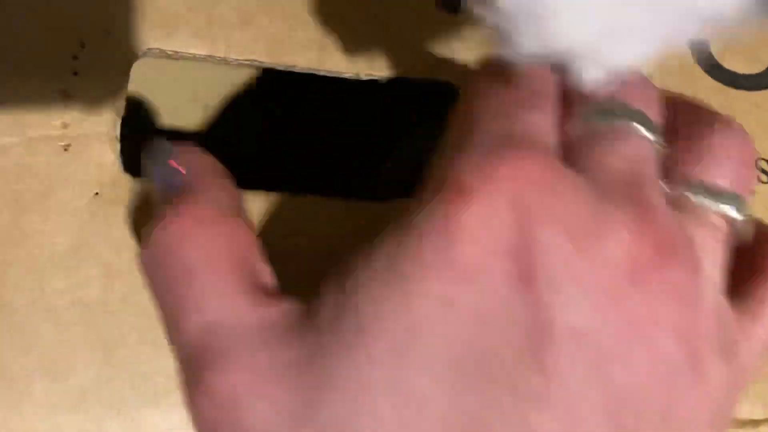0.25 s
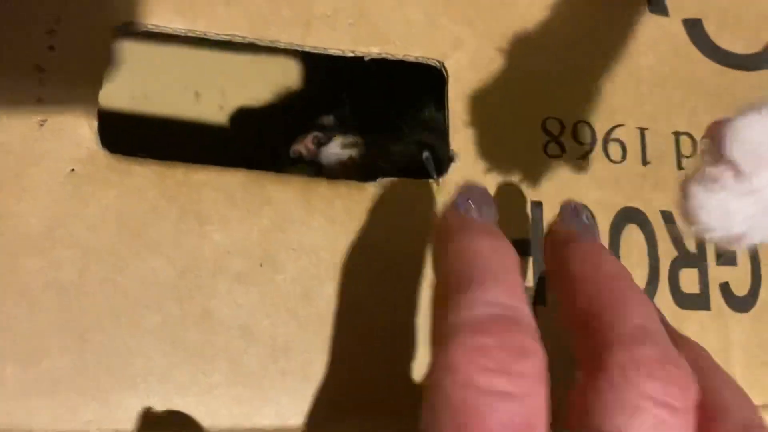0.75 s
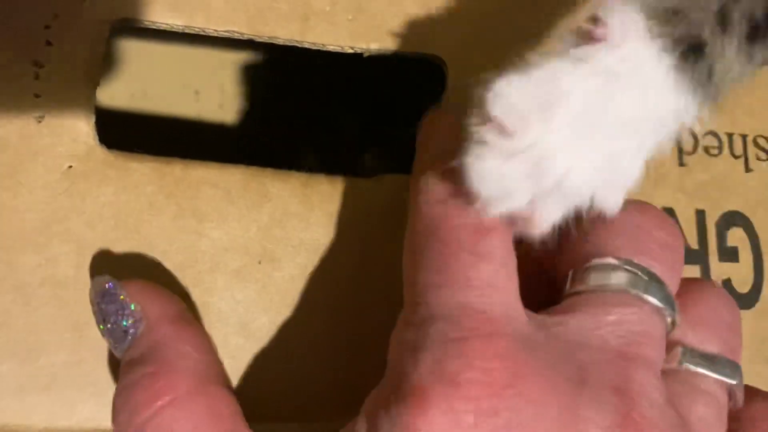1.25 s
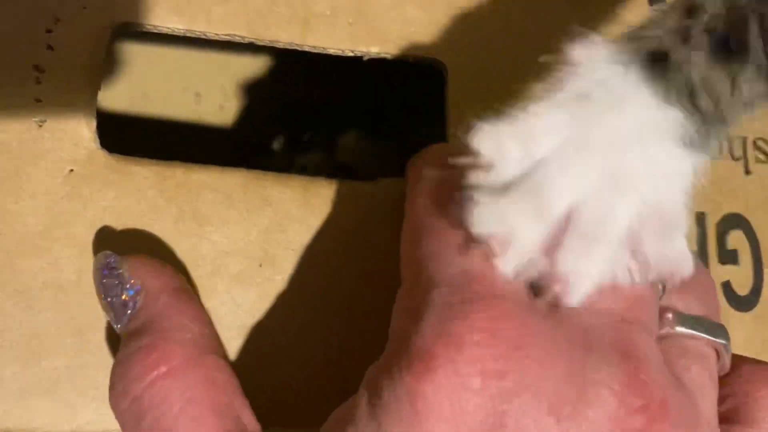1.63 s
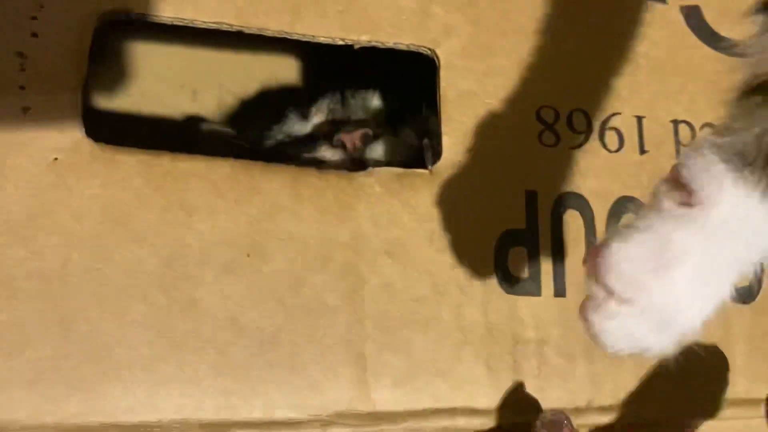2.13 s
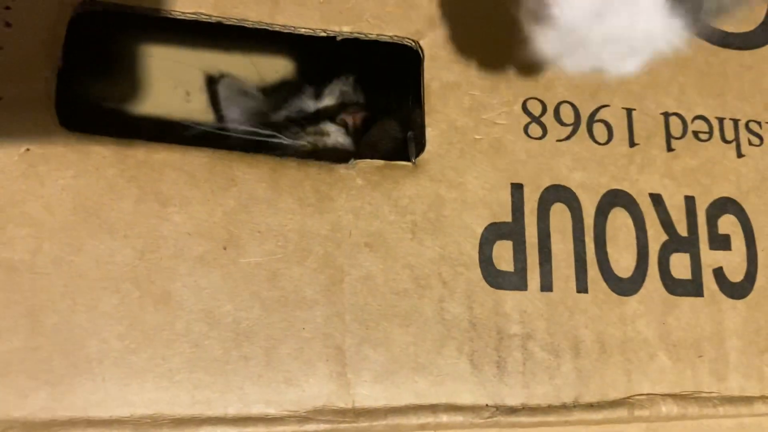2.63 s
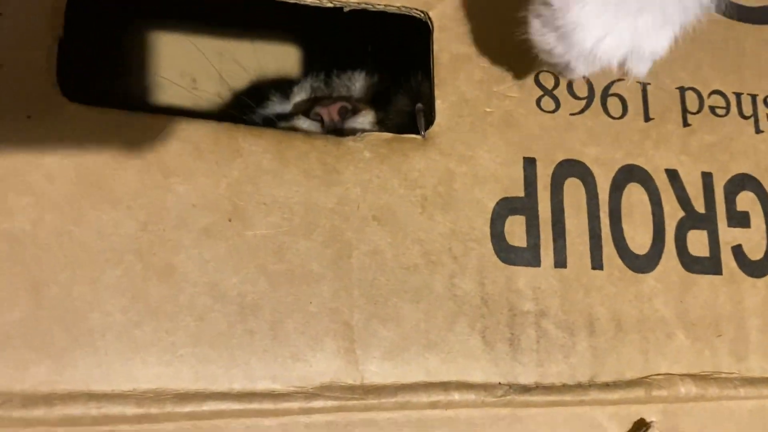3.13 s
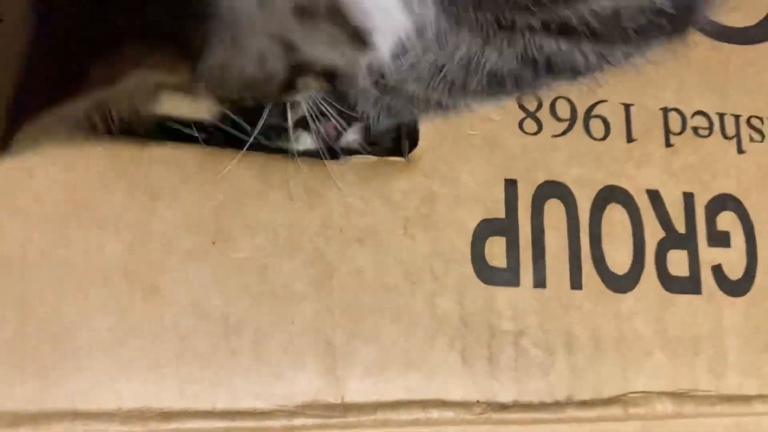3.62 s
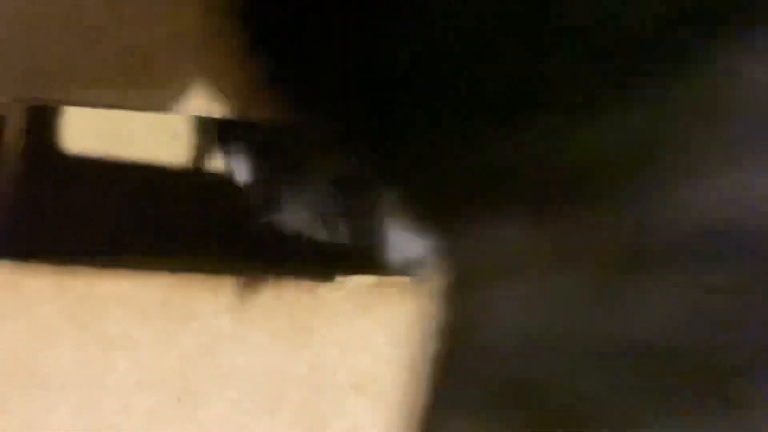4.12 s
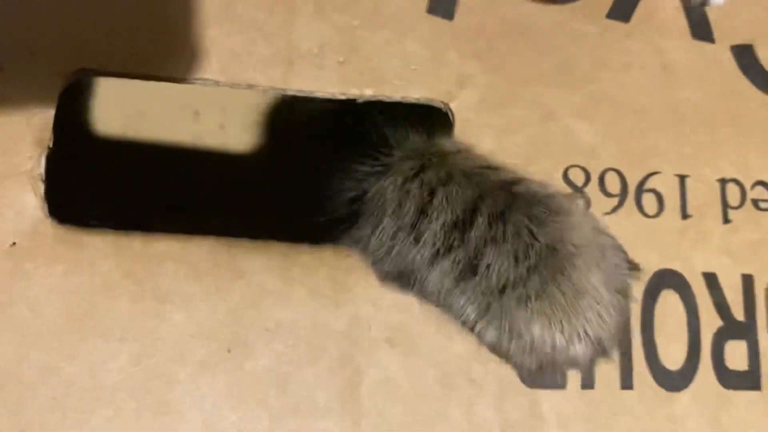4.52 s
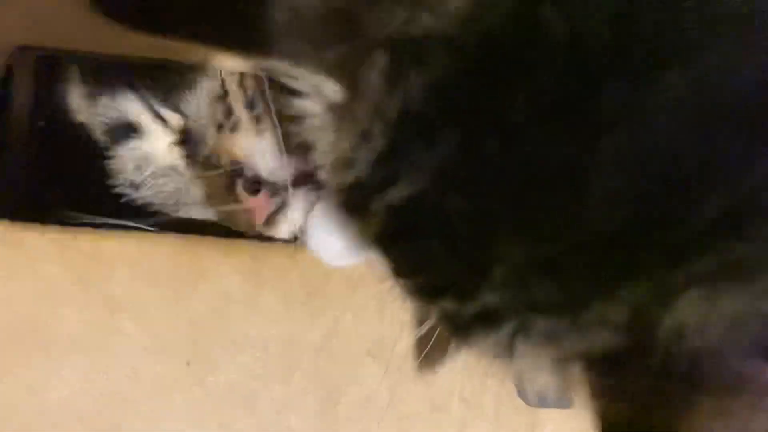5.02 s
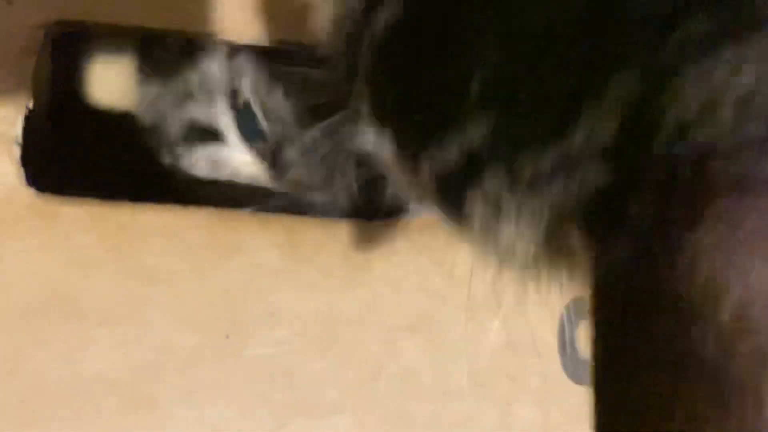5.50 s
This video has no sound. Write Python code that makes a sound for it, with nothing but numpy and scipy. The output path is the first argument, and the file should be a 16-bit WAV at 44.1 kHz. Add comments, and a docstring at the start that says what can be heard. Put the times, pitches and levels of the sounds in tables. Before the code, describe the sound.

Paws pat and bat a hollow cardboard box right beside the microphone. Early sounds are small: muffled bumps, faint ticks, brushing fur and pads. After three and a half seconds the blows grow heavier, with low, quickly damped booms, crisp claw clatter and short scrapes. A brief lull of toe pats precedes a last scuffle. Indoors, little echo, with faint room air and soft box rumble beneath.

```python
"""Small room, grip hole of a cardboard box, very near the microphone: two cats and a hand play.
Paws thump the panels: decaying sines swoop down in pitch over the ringing modes of the box.
Claws and nails tap and scratch: bursts of slips ring the card; toes pat it with dull knocks.
Pads slide on after each tap and longer strokes scuff: gritty noise shaped by stroke speed.
A low rumble of the swaying box and quiet air, both coloured noise, lie underneath."""
import sys
import numpy as np
from scipy import signal
from scipy.fft import rfft, irfft
from scipy.io import wavfile

SR = 44100
rng = np.random.default_rng(int(sys.argv[2]) if len(sys.argv) > 2 else 0)


def dump(signal):
    """Clip the signal to [-1, 1] and save it as 16-bit WAV at the path in sys.argv[1]."""
    limited = np.clip(np.atleast_2d(signal).T, -1, 1)
    pcm = np.round(limited * 32767).astype(np.int16)
    wavfile.write(sys.argv[1], SR, pcm)


N = 253997

# All event levels are relative: each source adds its own gain.
# Soft blows that flap a panel: t/s, level/dB, settled pitch f/Hz
THUMP_EVENTS = [(0.033, -33.5, 158), (0.096, -31.5, 93.6), (0.121, -37, 148), (0.254, -38, 160),
                (0.385, -39.5, 140), (0.608, -39.5, 70), (0.863, -26.5, 114.6), (0.893, -35.5, 53.6),
                (1.098, -26.5, 98.3), (1.105, -42.5, 347), (1.286, -30.5, 70), (1.29, -47.5, 204.5),
                (1.43, -43, 158), (1.843, -33, 56.9), (1.85, -51.5, 276), (2.191, -42.5, 233),
                (2.402, -43.5, 305), (2.473, -35.5, 173), (2.528, -40, 322), (2.583, -26, 55.3),
                (3.092, -36.5, 207.6), (3.115, -48.5, 263), (3.409, -38.5, 163.6), (3.486, -15.5, 137.7),
                (3.692, -39.5, 356.5), (3.85, -30.5, 200), (3.877, -22, 54.4), (4.124, -35, 550),
                (4.144, -22, 52.5), (4.264, -37.5, 225.3), (4.278, -23.5, 53), (4.403, -36, 129),
                (4.482, -25.5, 145.7), (4.669, -18, 174.2), (4.691, -18, 117.6), (4.742, -24.5, 63),
                (4.789, -25.5, 88), (4.856, -26, 111), (4.876, -35, 114), (5.309, -31, 122),
                (5.342, -40.5, 142), (5.492, -31.5, 101), (5.591, -23.5, 137), (5.749, -36.5, 168)]
# Claws and nails on the card: t/s, knock level/dB, tick level/dB, scratch length/s, knock corner f/Hz
TAP_EVENTS = [(0.031, -49, -47, 0.0072, 2450), (0.0411, -50, -40, 0.0015, 4130),
              (0.122, -47.5, -72, 0.003, 1540), (0.256, -40.5, -60.5, 0.0024, 1150),
              (0.3856, -70, -68, 0.0021, 1500), (0.613, -99, -56, 0.0024, 1950),
              (0.8211, -33, -55, 0.0029, 3730), (0.86, -49, -49, 0.0015, 1510),
              (1.0945, -68, -49.5, 0.001, 3020), (1.288, -63, -66, 0.0027, 1150),
              (1.3617, -46.5, -68, 0.00074, 2750), (1.432, -43.5, -61.5, 0.00061, 1380),
              (1.676, -58, -89, 0.00041, 3360), (2.748, -43.5, -60, 0.0081, 2550),
              (3.0307, -49.5, -64.5, 0.0019, 1750), (3.094, -57, -56.5, 0.0026, 1230),
              (3.562, -51, -65, 0.00085, 1490), (3.691, -37.5, -50, 0.015, 1540),
              (3.8433, -43, -48, 0.003, 2950), (3.914, -48, -44, 0.0031, 4250),
              (4.1246, -30, -41, 0.005, 1560), (4.137, -35.5, -48, 0.0089, 1550),
              (4.264, -49.5, -54, 0.0065, 1520), (4.539, -38.5, -59, 0.00051, 2340),
              (4.671, -41.5, -48.5, 0.016, 1390), (4.764, -37, -57, 0.0096, 2850),
              (4.791, -34, -38, 0.008, 4700), (4.804, -35, -63, 0.018, 3460),
              (4.856, -25, -35, 0.001, 3520), (4.874, -34, -38.5, 0.0047, 2330),
              (5.308, -40, -43, 0.0053, 3730), (5.338, -34, -45, 0.0023, 3600),
              (5.35, -30, -44, 0.0032, 3440), (5.391, -40, -77, 0.0027, 1710),
              (5.493, -56, -43.5, 0.0006, 1560), (5.5271, -44, -48.5, 0.011, 2000)]
# Long strokes of fur and pads: fastest moment t/s, half of full duration/s, rub level/dB,
# fur hiss level/dB, rub corner f/Hz
SCUFF_EVENTS = [(0.03, 0.29, -49, -60.5, 1800), (0.148, 0.08, -82, -67.5, 1500),
                (0.474, 0.5, -65.5, -61, 1790), (0.603, 0.13, -52.5, -82, 1850),
                (0.855, 0.13, -54, -66.5, 2390), (0.919, 0.14, -50.5, -66, 1720),
                (1.356, 0.037, -87, -70, 2000), (1.727, 0.19, -54.5, -71, 2100),
                (2.183, 0.13, -52.5, -98, 814), (2.414, 0.46, -49.5, -58.5, 1230),
                (2.456, 0.16, -49, -68.5, 1170), (2.551, 0.15, -45.5, -55, 834),
                (2.611, 0.071, -55.5, -77, 890), (2.75, 0.04, -63, -58.5, 2020),
                (2.922, 0.36, -65.5, -86, 1580), (3.161, 0.18, -50, -99, 1015),
                (3.504, 0.14, -57, -59.5, 2460), (3.672, 0.4, -55.5, -65, 2980),
                (3.917, 0.18, -49.5, -70, 1425), (4.167, 0.18, -54, -70, 2150),
                (4.248, 0.16, -54.5, -56, 1900), (4.411, 0.051, -59, -61.5, 1430),
                (4.534, 0.31, -55, -62, 2120), (4.641, 0.09, -46, -54.5, 2500),
                (4.768, 0.077, -56, -56.5, 3450), (4.818, 0.11, -48.5, -55, 3500),
                (5.15, 0.8, -56, -69.5, 1220), (5.366, 0.12, -50, -54.5, 3430),
                (5.463, 0.11, -43.5, -53, 1830), (5.61, 0.17, -44, -56.5, 2220),
                (5.755, 0.12, -54, -62, 1940)]
# Toes landing without their claws: t/s, level/dB
PAT_EVENTS = [(1.103, -42), (1.798, -52.5), (1.868, -51), (1.983, -44), (2.134, -45.5), (2.154, -55.5),
              (2.403, -60), (2.514, -50.5), (2.532, -50), (2.615, -46.5), (2.707, -55), (3.281, -46.5),
              (4.401, -52), (4.739, -43.5), (5.053, -52.5), (5.092, -46), (5.125, -38), (5.197, -44),
              (5.214, -47), (5.421, -34), (5.4908, -21.5)]
# Restless shifting of the cats, which sways the box: t/s, level/dB
SWAY_LEVELS = [(0, -39.5), (.7, -55.5), (1.3, -47), (2.1, -47.5), (2.55, -47.5), (3.25, -47.5), (4, -49),
               (4.5, -43.5), (5.05, -43), (5.76, -41.5)]
# Higher bending modes of a panel: nominal multiple of its pitch, level/dB
PANEL_OVERTONES = [(1.65, 3.5), (2.249, 1.5), (2.7, -3), (3.6, -17.5), (4.9, -13)]
# Modes of the whole box: nominal f/Hz, level/dB, undamped t60/s
BOX_MODES = [(55, -2, 0.14), (156, -4, 0.1), (322, -4, 0.068)]
# Stiff card modes, rung by taps: f/Hz, level/dB, t60/s
STIFF_MODES = [(800, 2, 0.045), (1080, 2, 0.05), (1490, -2, 0.06), (1890, -1, 0.04), (2710, -7, 0.05)]
# Spectrum of a knock on the card: f/Hz, level/dB
KNOCK_COLOUR = [(100, -3.5), (330, 13), (470, -5.5), (700, 6.5), (950, 1), (1400, 5), (1900, -1), (2250, 1),
                (2750, -4), (4000, -1), (12000, -49.5)]
# Spectrum of a claw tick: f/Hz, level/dB
TICK_COLOUR = [(1500, -9), (3500, 10), (5200, 8), (6500, 17.5), (8000, 9), (10500, 9.5), (16000, -5)]
# Spectrum of pads rubbing the card: f/Hz, level/dB
RUB_COLOUR = [(70, -33), (200, -2.5), (330, 6.5), (480, -10.5), (620, 1.5), (900, -2.5), (1550, -3),
              (2400, -4), (4000, -2), (14000, -1)]
# Spectrum of fur hissing over the card: f/Hz, level/dB
FUR_COLOUR = [(1500, 2.1), (3500, 1.74), (5200, 4.9), (6600, 7.9), (8000, 3.4), (10000, 9.2), (13000, 2.1),
              (16000, 6.56)]
# Spectrum of the swaying box: f/Hz, level/dB
RUMBLE_COLOUR = [(15, -73), (36, 1.5), (55, 0), (80, 0), (120, -13.5), (165, -12), (330, -33.5),
                 (8000, -55.5)]
# Spectrum of the room air: f/Hz, level/dB
AIR_COLOUR = [(30, 0), (200, -4), (700, -19), (1500, -27), (3000, -33), (5700, -29), (9000, -34),
              (16000, -33)]
# Decay of the card: f/Hz, t60/s
CARD_DECAY = [(300, 0.082), (1000, 0.021), (2500, 0.022), (7000, 0.0043), (15000, 0.025)]
# Decay of the room: f/Hz, t60/s
ROOM_DECAY = [(100, 0.23), (500, 0.089), (3000, 0.084), (14000, 0.0081)]
# Filter on the difference between the two microphone ports: f/Hz, gain/dB
SIDE_GAIN = [(60, -15), (150, -14.5), (300, -11), (1100, -4.5), (2300, 0), (4400, -4.5), (8200, 6),
             (11000, -10), (14000, -35)]
# Unequal response of the ports: f/Hz, left minus right/dB
PORT_TILT = [(150, -1.5), (330, -3), (700, -1), (1300, -1.5), (2300, 3), (4200, -8), (8000, -3.5),
             (13000, -0.5)]

# Overtones grow when a claw lands with the pad, and on deeper panels.
PAD_OVERTONES_DB, CLAW_OVERTONES_DB, OVERTONES_DB_PER_OCTAVE, TOGETHER_S = -19, 5.5, -6, 0.0075
# Slide after a tap: peak delay, half of the rise and fall durations, relative levels
SLIDE_PEAK_S, SLIDE_HALF_RISE_S, SLIDE_HALF_FALL_S = 0.0034, 0.019, 0.093
SLIDE_RUB_DB, SLIDE_HISS_DB = -60, -77
SLIDE_FOLLOW_DB_PER_DB = 0.18  # a hard tap partly bounces clear
SPEEDING_SHARE = 0.74  # share of a stroke spent gathering speed
AIR_DB, EDGE_HZ = -66, 16100


def amp(db):
    """Decibels to gain."""
    return 10 ** (np.asarray(db) / 20)


def unit(x):
    """Scales each channel to an rms of 1."""
    return x / np.sqrt(np.mean(x ** 2, axis=-1, keepdims=True) + 1e-20)


def decay(t, t60_s):
    """Exponential decay by 60 dB in t60_s."""
    return np.exp(-np.log(1000) * t / t60_s)


def read(points, hz):
    """Interpolates (Hz, value) on a log-frequency axis."""
    f, value = np.transpose(points)
    return np.interp(np.log(hz + 1), np.log(f), value)


def curve(rows, column):
    """One column of a timed table at every sample."""
    rows = np.asarray(rows)
    return np.interp(np.arange(N) / SR, rows[:, 0], rows[:, column])


def add(mix, s, sound):
    """Mixes a sound in at time s."""
    part = mix[..., max(0, round(s * SR)):][..., :sound.shape[-1]]
    part += sound[..., :part.shape[-1]]


def colour(x, points, size=4096):
    """Causal minimum-phase filter with the given spectrum."""
    log_gain = np.log(amp(read(points, abs(np.fft.fftfreq(size, 1 / SR)))))
    impulse = np.fft.ifft(np.exp(np.conj(signal.hilbert(log_gain)))).real
    return signal.fftconvolve(np.atleast_2d(x), impulse[None], axes=1)[:, :x.shape[-1]]


def varied(points, spread_db, shift=0.):
    """Random colour of one spot on the card: levels and resonances vary."""
    stretch = np.exp(shift * rng.uniform(-0.91, 1))
    return [(hz * stretch, db + rng.uniform(-spread_db, spread_db)) for hz, db in points]


def low_pass(x, corner_hz, order=2):
    """Cuts the treble that a soft contact cannot excite."""
    return signal.sosfilt(signal.butter(order, corner_hz, fs=SR, output="sos"), x)


def wander(rate_hz):
    """Smooth random curve of rms 1."""
    hz = np.fft.rfftfreq(N, 1 / SR)
    return unit(irfft(rfft(rng.standard_normal(N)) / (1 + (hz / rate_hz) ** 2), N))


def ring(t60s, size, count=8):
    """Two dense decays: each octave band of noise dies at its own speed."""
    t, hz = np.arange(size) / SR, np.fft.rfftfreq(size, 1 / SR)
    centres_hz = np.geomspace(125, 16000, count)
    random_phase = np.exp(2j * np.pi * rng.random((2, len(hz))))
    out = np.zeros((2, size))
    for share, t60_s in zip(np.eye(count), read(t60s, centres_hz)):
        band = irfft(random_phase * np.interp(hz, centres_hz, share), size)
        out += band * decay(t, t60_s)
    return out


def bend(x, first_hz, travel_s_at_1khz=0.002424):
    """Bending waves cross the card more slowly the lower they are, so a knock falls in pitch."""
    size = x.shape[-1]
    hz = np.maximum(np.fft.rfftfreq(size, 1 / SR), 100)
    late_s = travel_s_at_1khz * np.maximum(np.sqrt(1000 / hz) - np.sqrt(1000 / first_hz), 0)
    phase = 2 * np.pi * np.cumsum(late_s) * SR / size  # delay integrated over frequency
    return irfft(rfft(x) * np.exp(-1j * phase), size)


def background(sway_db=1, lurch_db=2):
    """Hollow rumble of the swaying box over the quiet air of the room."""
    sway, air = rng.standard_normal((2, 2, N))
    sway_level = amp(curve(SWAY_LEVELS, 1) + sway_db + lurch_db * wander(2.5))
    rumble = sway_level * unit(colour(sway, RUMBLE_COLOUR))
    return rumble + amp(AIR_DB) * unit(colour(air, AIR_COLOUR))


def friction(grains_per_s, grit, uneven_db, uneven_hz, size=2048):
    """Countless fibres slip under uneven pressure; larger catches ring the card."""
    sizes = amp(4 * np.minimum(rng.exponential(1, N), 3))
    catches = (rng.random(N) < grains_per_s / SR) * sizes * rng.choice([-1, 1], N)
    rung = signal.fftconvolve(catches[None], ring(CARD_DECAY, size), axes=1)[:, :N]
    fibres = rng.standard_normal((2, N))
    return unit((fibres + grit * unit(rung)) * amp(uneven_db * wander(uneven_hz)))


def strokes(usual_knock_db=-42, usual_tick_db=-50):
    """Long strokes and slides after taps: peak t/s, half rise/s, half fall/s, rub/dB, hiss/dB, corner/Hz."""
    out = []
    for s, half_s, rub_db, hiss_db, corner_hz in SCUFF_EVENTS:
        out.append((s, SPEEDING_SHARE * half_s, (1 - SPEEDING_SHARE) * half_s, rub_db, hiss_db, corner_hz))
    for s, knock_db, tick_db, _, corner_hz in TAP_EVENTS:
        rub_db = SLIDE_RUB_DB + SLIDE_FOLLOW_DB_PER_DB * (knock_db - usual_knock_db)
        hiss_db = SLIDE_HISS_DB + SLIDE_FOLLOW_DB_PER_DB * (tick_db - usual_tick_db)
        out.append((s + SLIDE_PEAK_S, SLIDE_HALF_RISE_S, SLIDE_HALF_FALL_S, rub_db, hiss_db, corner_hz))
    return out


def scuffs(rub_gain_db=4, fur_gain_db=9.5, rub_spread_db=6, rub_shift=0.3, fur_spread_db=2):
    """Strokes speed up and slow down: pads rub from one spot to another while fur hisses."""
    pads = friction(grains_per_s=420, grit=3.5, uneven_db=3.6, uneven_hz=70)
    fibres = friction(grains_per_s=500, grit=0.8, uneven_db=2.8, uneven_hz=35)
    t, out = np.arange(N) / SR, np.zeros((2, N))
    for s, half_rise_s, half_fall_s, rub_db, hiss_db, corner_hz in strokes():
        span = [s - 2 * half_rise_s, s, s + 2 * half_fall_s]
        moving = slice(*np.searchsorted(t, span[::2]))
        envelope = np.interp(t[moving], span, [0, 1, 0]) ** 3
        travel = np.interp(t[moving], span, [0, .5, 1])
        first = unit(colour(pads[:, moving], varied(RUB_COLOUR, rub_spread_db, rub_shift)))
        last = unit(colour(pads[:, moving], varied(RUB_COLOUR, rub_spread_db, rub_shift)))
        rub = unit(low_pass((1 - travel) * first + travel * last, corner_hz))
        hiss = unit(colour(fibres[:, moving], varied(FUR_COLOUR, fur_spread_db)))
        out[:, moving] += envelope * (amp(rub_db + rub_gain_db) * rub + amp(hiss_db + fur_gain_db) * hiss)
    return out


def taps(knock_gain_db=1, tick_gain_db=0, drag=0.78, ringing=0.63, chatter_db=-18, chatter_s=0.021,
         bite_share=0.17, size=4096):
    """A claw lands and drags in tiny slips; each dents and rings the card, which chatters briefly."""
    t, out = np.arange(size) / SR, np.zeros((2, N))
    level_scale = np.sqrt(.01 * SR / size)  # levels refer to the rms over 10 ms
    blow = unit(t == 0)
    for s, knock_db, tick_db, length_s, corner_hz in TAP_EVENTS:
        slips, chatter = rng.standard_normal((2, 2, size)) ** 3
        drag_envelope = (1 - np.exp(-t / (bite_share * length_s))) * np.exp(-(t / length_s) ** 2)
        force = drag * unit(slips * drag_envelope)
        force += blow / (1 + (length_s / 0.001) ** 2)  # a glancing claw lands softly
        response = blow + ringing * unit(ring(CARD_DECAY, size))
        card = unit(signal.fftconvolve(force, response, axes=1)[:, :size])
        card += amp(chatter_db) * unit(chatter * np.exp(-t / chatter_s))
        soft = low_pass(colour(card, varied(KNOCK_COLOUR, 0.45)), corner_hz)
        knock = unit(bend(soft, corner_hz))
        tick = unit(colour(card, varied(TICK_COLOUR, 0.21)))
        sound = amp(knock_db + knock_gain_db) * knock + amp(tick_db + tick_gain_db) * tick
        add(out, s, level_scale * sound)
    return out


def card_ring(ring_db=-15, ring_follow=0.84, hard_knock_db=-27, spot_db=3, size=8192):
    """Each tap rings the stiff modes in random shares, as for different spots on the card."""
    t, out = np.arange(size) / SR, np.zeros((2, N))
    for s, knock_db, *_ in TAP_EVENTS:
        tap_db = hard_knock_db + ring_db + ring_follow * (knock_db - hard_knock_db)
        draws = rng.uniform(-0.48, 1, (len(STIFF_MODES), 3))
        for (hz, mode_db, t60_s), (spot, *phase) in zip(STIFF_MODES, draws):
            mode = decay(t, t60_s) * np.sin(2 * np.pi * (hz * t + np.c_[phase]))
            add(out, s, amp(tap_db + mode_db + spot_db * spot) * mode)
    return out


def hardness(s, hz):
    """Overtone level/dB of a blow: raised by a nearby claw tap and a lower pitch."""
    claw = max(np.exp(-((tap[0] - s) / TOGETHER_S) ** 2) for tap in TAP_EVENTS)
    return PAD_OVERTONES_DB + CLAW_OVERTONES_DB * claw + OVERTONES_DB_PER_OCTAVE * np.log2(hz / 150)


def damping(db, heavy_db=-16, press=0.41):
    """Decay speed-up under the paw that stays on: a heavy blow presses harder."""
    return 1 + press * amp(db - heavy_db)


def thumps(rise_turns=2.28, sag=2.422, settle_s=0.00328, panel_t60_s=0.066, overtone_life=0.67,
           gain_db=13.0, detuned_db_per_octave=-9, size=22000):
    """A paw flaps a panel; short bending waves arrive first, so pitch swoops down and the box rings."""
    t, out = np.arange(size) / SR, np.zeros(N)
    for s, db, hz in THUMP_EVENTS:
        damped = damping(db)
        overtones_db = hardness(s, hz)
        turns = hz * (t + sag * settle_s * (1 - np.exp(-t / settle_s)))
        fade = decay(t, panel_t60_s * (1 + (60 / hz) ** 2) / damped)  # deep flaps last longer
        flap = fade * np.sin(2 * np.pi * turns)
        for multiple, mode_db in PANEL_OVERTONES:
            mode_turns = multiple * (1 + 0.1 * rng.uniform(-1.17, 1)) * turns
            mode = np.sin(2 * np.pi * (mode_turns + rng.random()))
            flap += amp(overtones_db + mode_db) * fade ** (1 / overtone_life) * mode
        for box_hz, box_db, box_t60_s in BOX_MODES:
            pressed_hz = box_hz * (1 + 0.057 * rng.uniform(-0.8, 1))  # weight on the box varies by blow
            # modes near the panel's pitch answer most
            woken_db = box_db + detuned_db_per_octave * abs(np.log2(hz / box_hz))
            mode = np.sin(2 * np.pi * (pressed_hz * t + rng.random()))
            flap += amp(woken_db) * decay(t, box_t60_s / damped) * mode
        rise = 1 - np.exp(-(turns / rise_turns) ** 2)
        add(out, s, amp(db + gain_db) * flap * rise)
    return out


def pat(dull_hz=1750, ringing=2.1, spread_db=4, shift=0.092, size=2048):
    """One toe landing without its claw: a dull, woody knock."""
    push = unit(np.arange(size) == 0) + ringing * unit(ring(CARD_DECAY, size))
    knock = colour(push, varied(KNOCK_COLOUR, spread_db, shift))
    return unit(bend(low_pass(knock, dull_hz, order=4), dull_hz))


def pats(gain_db=-7):
    """Toes land one by one."""
    out = np.zeros((2, N))
    for s, db in PAT_EVENTS:
        add(out, s, amp(db + gain_db) * pat())
    return out


def room(x, rise_s=0.0046, size=16384):
    """Short, faint tail from the nearby walls: decaying noise with a soft onset."""
    tail = ring(ROOM_DECAY, size) * (1 - np.exp(-np.arange(size) / SR / rise_s))
    return signal.fftconvolve(x, tail / np.linalg.norm(tail[0]), axes=1)[:, :N]


def scene(thump_room_db=-14, tap_room_db=-18, direct_share=0.027):
    """Sums all sources as mid and side, picked up by two ports of unequal response."""
    boom = signal.hilbert(thumps())
    panels = np.array([boom.real, boom.imag])  # the side signal follows the pressure gradient
    claws = taps() + pats() + card_ring()
    near, scattered = claws + amp(tap_room_db) * room(claws) + scuffs()
    gradient = signal.hilbert(near).imag
    surface_side = direct_share * gradient + np.sqrt(1 - direct_share ** 2) * scattered
    surface = np.array([near, surface_side])
    mid, side = panels + amp(thump_room_db) * room(panels) + surface + background()
    side = colour(side, SIDE_GAIN)[0]
    ports = []
    for sign in (1, -1):  # left, right
        response = [(hz, sign * db / 2) for hz, db in PORT_TILT]
        ports.append(colour(mid + sign * side, response))
    return np.vstack(ports)


def record(dry, low_cut_hz=40, order=4):
    """Low cut of the microphone and band limit of the recorder."""
    low_cut = signal.butter(order, low_cut_hz, "highpass", fs=SR, output="sos")
    thinned = signal.sosfilt(low_cut, dry)
    edge = signal.firwin(511, EDGE_HZ, window=("kaiser", 9), fs=SR)
    return signal.oaconvolve(thinned, edge[None], "same", axes=1)


dry = scene()
out = record(dry)
dump(out)
```